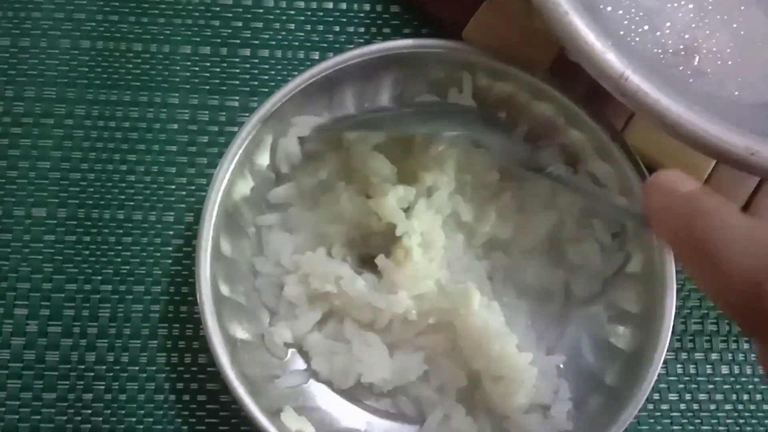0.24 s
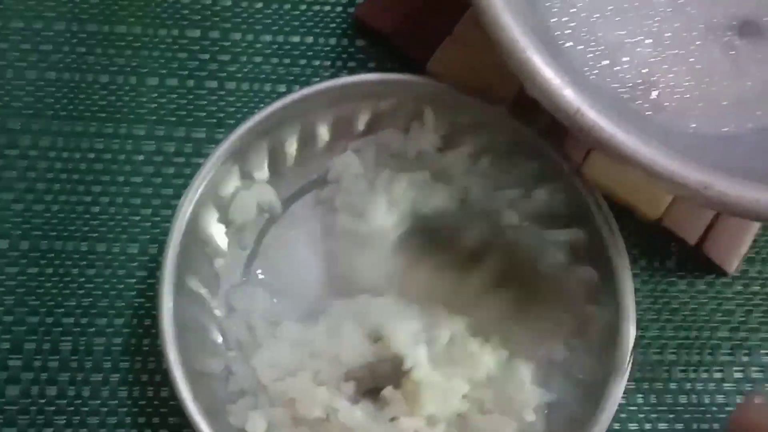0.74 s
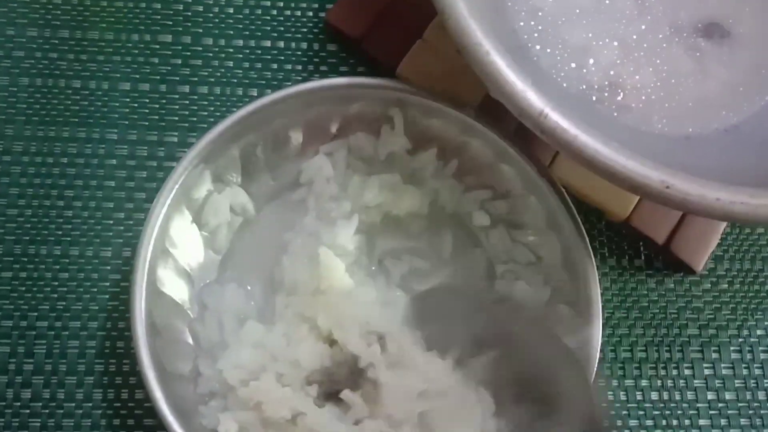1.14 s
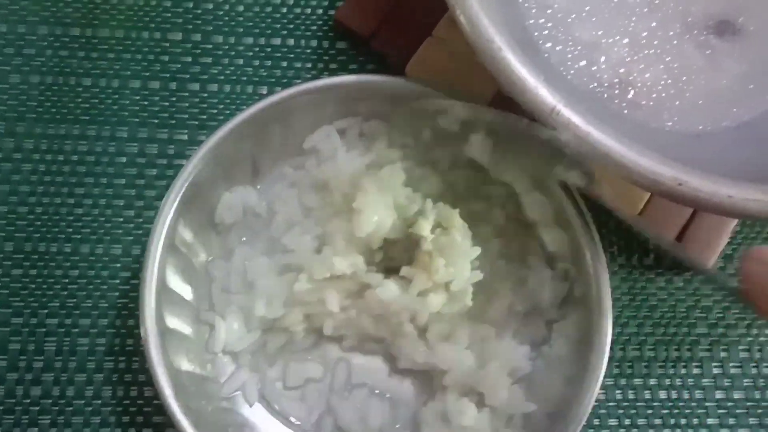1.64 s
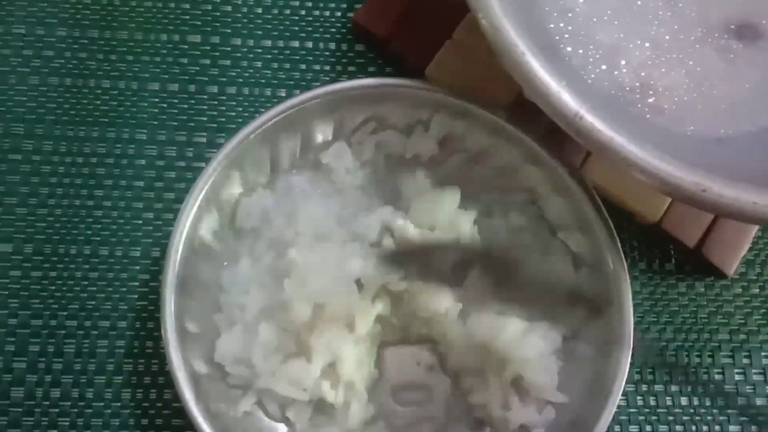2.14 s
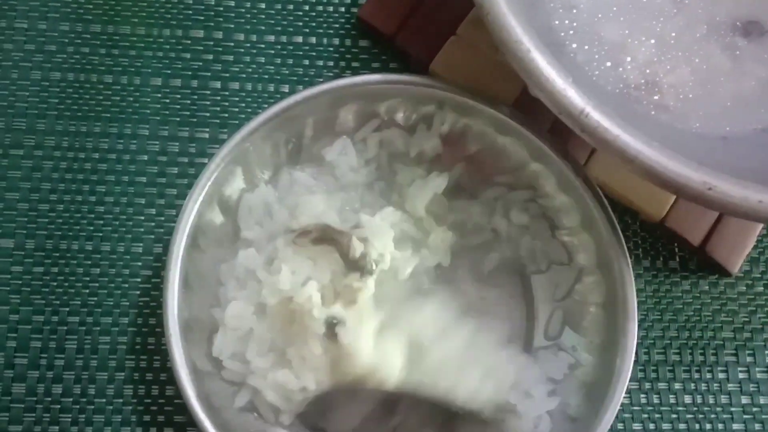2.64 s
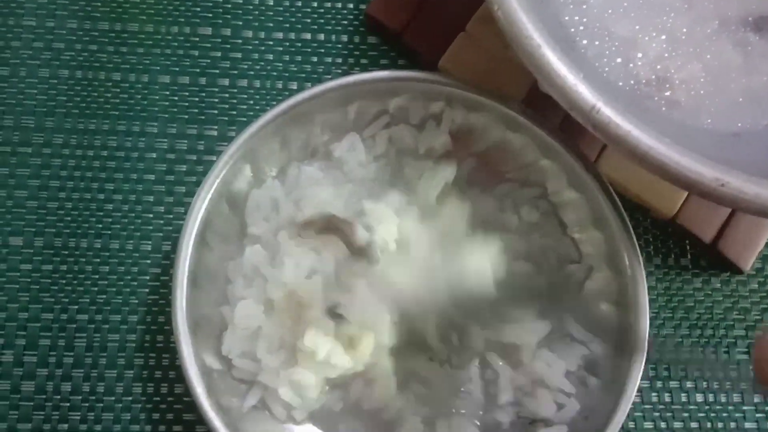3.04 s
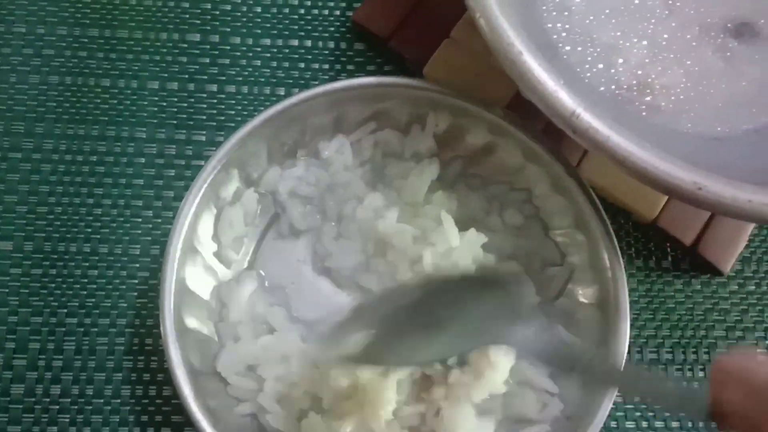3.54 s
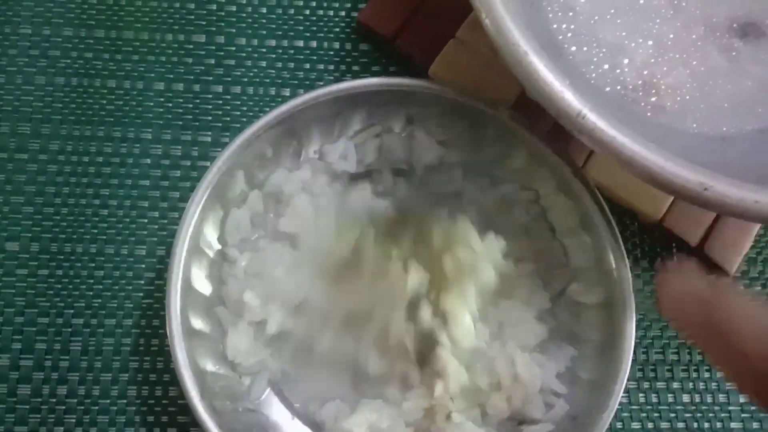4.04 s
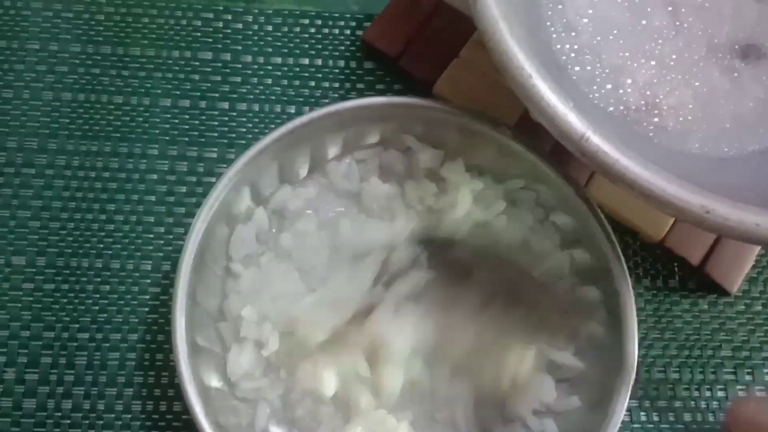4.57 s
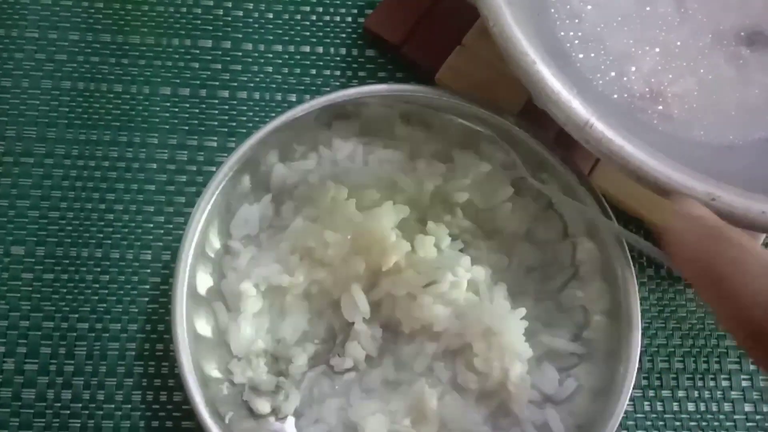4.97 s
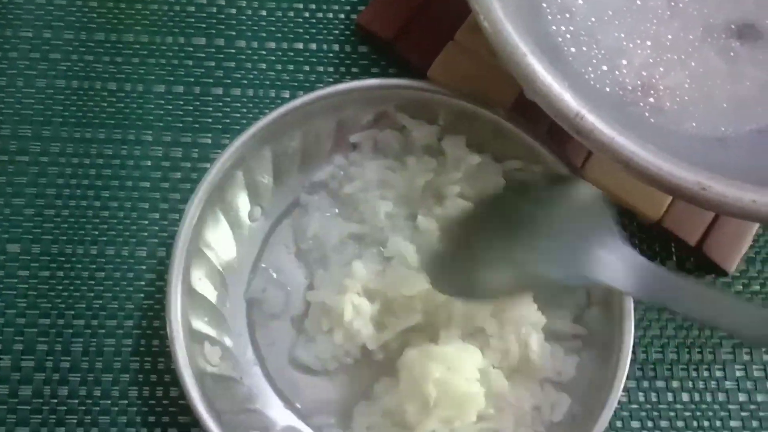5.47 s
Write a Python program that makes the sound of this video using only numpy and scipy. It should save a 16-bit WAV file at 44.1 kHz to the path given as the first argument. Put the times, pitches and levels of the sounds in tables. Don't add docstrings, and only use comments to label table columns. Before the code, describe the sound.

Irregular sharp spoon clanks and short gritty scrapes on a steel dish of rice, with brief rings, pauses and a faint distant horn.

```python
import sys
import numpy as np
from scipy import signal
from scipy.fft import rfft, irfft
from scipy.io import wavfile
from scipy.ndimage import uniform_filter1d

SR = 44100
rng = np.random.default_rng(int(sys.argv[2]) if len(sys.argv) > 2 else 0)


def how_loud(loudness_db):
    steps = np.asarray(loudness_db, float) / 20
    return 10 ** steps


def put_to_file(sound):
    columns = np.atleast_2d(sound).T
    safe = np.clip(columns, -1, 1)
    whole_steps = np.round(safe * 32767)
    wavfile.write(sys.argv[1], SR, whole_steps.astype(np.int16))


N = 251811


def evened(x):
    return x / np.sqrt(np.mean(x ** 2) + 1e-20)


def read(points, hz):
    f, value = np.transpose(points)
    return np.interp(np.log(hz + 1), np.log(f + 1), value)


def layered(events):
    layer = np.zeros(N)
    for s, sound in events:
        part = layer[round(s * SR):][:len(sound)]
        part += sound[:len(part)]
    return layer


def resonate(x, hz, width):
    pole = np.exp((2j * np.pi * hz - np.pi * width) / SR)
    return 2 * signal.lfilter([1 - abs(pole)], [1, -pole], x).real


def wander(size, hz):
    noise = rng.standard_normal(size + 2000)
    return evened(signal.lfilter([1], [1, -np.exp(-2 * np.pi * hz / SR)], noise)[2000:])


def band(x, low_hz, high_hz, order):
    return signal.sosfilt(signal.butter(order, [low_hz, high_hz], "bandpass", fs=SR, output="sos"), x)


def patchy(x, db, size):
    z = signal.stft(x, nperseg=256, noverlap=192)[2]
    patches = uniform_filter1d(rng.standard_normal(z.T.shape), size=size, axis=0)
    patches = uniform_filter1d(patches, size=2, axis=1)
    return signal.istft(z * how_loud(db * evened(patches).T), nperseg=256, noverlap=192)[1][:len(x)]


# (frequency [Hz], level [dB per Hz])
AIR_COLOUR = [(30, -13), (70, -22), (105, -4), (300, -4), (600, -11), (1000, -9.5), (1560, -15),
              (1850, -23), (3000, -24), (8000, -21.5), (9700, -26.5), (10600, -41), (13000, -51),
              (16000, -43)]
# (frequency [Hz], width [Hz], level [dB])
CAVITY_PEAKS = [(831, 98, 7.5), (1495.4, 33.4, 18), (5070, 236, 15), (4310, 54, 11), (6100, 1630, -11.5),
                (6800, 120, 13.5), (7660, 87, 12.5), (3620, 210, -13), (9240, 430, 2.5)]


def air():
    frames, hz = N // 256 + 5, np.fft.rfftfreq(1024, 1 / SR)
    a, b, patches = rng.standard_normal((frames, 513, 3)).T
    patches = uniform_filter1d(patches, size=5, axis=0)
    patches = evened(uniform_filter1d(patches, size=12, axis=1))
    peaks_db = sum(db / (1 + (2 * (hz - f) / w) ** 2) for f, w, db in CAVITY_PEAKS)
    colour_db = read(AIR_COLOUR, hz) + peaks_db
    patchy_db = np.interp(hz, [0, 1500, 4000], [3.0, 2.8, 2.0])
    z = (a + 1j * b) * how_loud(colour_db[:, None] + patchy_db[:, None] * patches)
    return how_loud(-55.5) * evened(signal.istft(z, nperseg=1024, noverlap=768)[1][:N])


# (middle [s], peak level [dB], half length [s])
HUM_SWELLS = [(.05, -65, 0.58), (0.571, -48.5, 0.011), (0.91, -62.5, 0.13), (1.16, -60.5, 0.11),
              (1.398, -48, 0.018), (1.878, -51, 0.05), (2.144, -54.5, 0.16), (2.794, -62, 0.048),
              (3.002, -55.5, 0.068), (3.504, -54, 0.058), (4.4, -60.5, 0.11), (4.967, -57.5, 0.19),
              (5.53, -52.5, 0.26)]


def hum():
    t = np.arange(N) / SR
    hum_hz, bed_db = 352.7, -67
    tone = np.sin(2 * np.pi * np.cumsum(hum_hz + 2.54 * wander(N, hz=6.46)) / SR)
    skirt = evened(resonate(rng.standard_normal(N), hum_hz, 16.7))
    swell = sum(how_loud(db) * np.exp(-((t - s) / half) ** 2) for s, db, half in HUM_SWELLS)
    return (swell + how_loud(bed_db)) * evened(tone + 0.6 * skirt)


def rumble():
    lumps = evened(resonate(wander(N, hz=15.0), 0, 32))
    low_noise = resonate(resonate(rng.standard_normal(N), 113.0, 45), 113.0, 45)
    return how_loud(-68.0 + 4 * lumps) * evened(low_noise)


# (time [s], peak level [dB], frequency [Hz], length [s])
MAT_THUDS = [(0.241, -48, 136.2, 0.053), (0.681, -45.5, 132.5, 0.036), (1.738, -62, 151.3, 0.048),
             (2.306, -52.5, 133.7, 0.065), (2.536, -56, 98, 0.11), (2.673, -71, 93, 0.031),
             (3, -50.5, 132.4, 0.042), (3.431, -53.5, 134.5, 0.041), (3.699, -48, 137.4, 0.056),
             (3.974, -70, 107, 0.039), (4.257, -55.5, 119.4, 0.026), (4.674, -56.5, 152, 0.016),
             (5.074, -45, 129.4, 0.033), (5.352, -56, 139, 0.025)]


def thuds():
    for s, db, hz, length in MAT_THUDS:
        t = np.arange(round(3 * length * SR)) / SR
        turns = np.cumsum(hz * (1 + 0.19 * wander(len(t), hz=31.4))) / SR
        rocking = np.sin(2 * np.pi * turns) + 0.62 * np.cos(4 * np.pi * turns)
        rocking += 0.098 * np.sin(6 * np.pi * turns)
        envelope = 3.13 * (t / (0.35 * length)) * np.exp(-t / (0.55 * length))
        yield s - .01, how_loud(db) * rocking * envelope


# (frequency [Hz], level [dB per Hz])
STEEL_COLOUR = [(530, 17.5), (900, -13.5), (1500, 1), (1820, -13.5), (2010, -1), (2330, -7.5), (2660, 0),
                (4540, -3), (8660, 0), (10300, -8), (14100, -13.5), (15500, -21), (16500, -55.5)]


def steel_db(hz):
    return read(STEEL_COLOUR, hz)


def strike(s, db, low_db, top_db, strongest, rise):
    t = np.arange(4096) / SR
    place, size, life = rng.random((44, 3, 1)).transpose(1, 0, 2)
    hz = 750 + (np.arange(44)[:, None] + place) * 345
    t60 = (0.013 + 0.041 * life ** 2) * (5000 / hz) ** 0.12
    trim_db = np.interp(hz, [3220, 5530, 8800, 10900], [low_db + 10.0, 0, 0, top_db + 24.5])
    mode_db = steel_db(hz) + trim_db + 4 * size - 60 * t / t60
    many = (how_loud(mode_db) * np.sin(2 * np.pi * (hz * t + place))).sum(axis=0)
    few = 0
    for f, width, f_db in strongest:
        decay_db = 60 * t * np.clip(width, 25, 400) / 4.45
        few = few + how_loud(f_db - decay_db) * np.sin(2 * np.pi * f * t)
    rebounds = rng.standard_normal(300) * how_loud(-8.5 - 60 * t[:300] / 0.018) * (rng.random(300) < .05)
    rebounds[0] = 1
    modes = 0.72 * many / abs(many[40:]).max() + 0.43 * few
    chatter = signal.fftconvolve(modes, rebounds)[:len(t)]
    touch = 1.15 * np.sin(2 * np.pi * 4000 * t) * np.exp(-t / 0.0002) * (rise < .0005)
    return s, how_loud(db - 6.5) * (chatter * np.minimum(t / rise, 1) + touch)


# (time [s], peak level [dB], low part [dB], top part [dB])
HARD_BLOWS = [(0.236, -16, -10, -17), (0.3458, -14.5, -11, -26), (0.634, -24.5, 1, -38),
              (0.657, -11.5, -16, -19), (1.0751, -21.5, -15, -16.5), (1.665, -14, -14, -20),
              (1.72, -15.5, -16, -24), (1.7646, -12, -17.5, -27), (2.2844, -17, -19, -15),
              (2.3667, -19.5, -34, -27), (2.5978, -15.5, -10.5, -34), (2.9639, -16.5, -21, -16),
              (2.9836, -13.5, -16.5, -28), (3.4187, -14, -10, -27), (3.676, -16, -66, -18),
              (5.0594, -20.5, -4, -16), (5.2298, -20, -7.5, -17), (5.25, -18, -1, -36),
              (5.3415, -25, -4, -25), (5.7017, -19.5, -25, -20)]
BLOW_MODES_HZ = [(5810.0, 8580.0, 1500.0, 6830.0, 2520.0), (6820.0, 8100.0, 1990.0, 7330.0, 2700.0),
                 (3750.0, 2620.0, 5010.0, 5660.0, 1400.0), (9450.0, 8830.0, 5000.0, 7600.0, 3600.0),
                 (9360.0, 7490.0, 8750.0, 6570.0, 3200.0), (5920.0, 5390.0, 8670.0, 2750.0, 4400.0),
                 (2720.0, 7070.0, 5470.0, 8420.0, 2300.0), (7220.0, 6430.0, 4430.0, 8840.0, 2000.0),
                 (9340.0, 6400.0, 8710.0, 9850.0, 5000.0), (7530.0, 8670.0, 4190.0, 6370.0, 2500.0),
                 (8930.0, 6020.0, 7660.0, 3110.0, 1600.0), (8810.0, 6840.0, 7500.0, 6010.0, 2000.0),
                 (6830.0, 8820.0, 7320.0, 5160.0, 2050.0), (7630.0, 7140.0, 8960.0, 4110.0, 2440.0),
                 (7630.0, 5030.0, 9390.0, 6720.0, 3360.0), (6620.0, 3220.0, 8970.0, 6070.0, 1700.0),
                 (2640.0, 8860.0, 3610.0, 7150.0, 3200.0), (8610.0, 2640.0, 5180.0, 3140.0, 3600.0),
                 (8260.0, 6260.0, 5300.0, 7200.0, 3900.0), (8480.0, 7070.0, 5570.0, 1490.0, 3000.0)]
BLOW_MODES_DB = [(2.5, -2, -10.5, 3.5, 3.5), (-1, -9, -3, 0.5, 6.5), (7.5, 4, 3, 4.5, -8),
                 (-5, -6, 0.5, -15, -16), (3, 1, -1.5, 0, 0.5), (11, 10.5, -2, -23, 3),
                 (2.5, 2, -2, -4, -15), (1.5, -1, -6, -9, -2.5), (1.5, 0, -4, -5.5, 2),
                 (1.5, 1.5, -2.5, -10, -3), (6.5, -1.0, -11, 7.5, -0.5), (6.0, 3, 0, -1.5, -0.5),
                 (-2, 1.0, 0, -6, -3), (-6, -4, -9.5, -9, -9), (-1, 5, -4, 2, -1), (3, 2.5, 0.5, 0.5, 4),
                 (4.5, -8, 0.0, -2, 2.5), (-5, -1.0, -3.5, -6, -15), (3, 0, -0.5, 3, -8),
                 (4.5, 3.5, 0, 2.5, 4.5)]


def blows():
    for row, modes_hz, modes_db in zip(HARD_BLOWS, BLOW_MODES_HZ, BLOW_MODES_DB):
        strongest = [(hz, 159 * (5000 / hz) ** 0.9, db) for hz, db in zip(modes_hz, modes_db)]
        yield strike(*row, strongest, rise=0.00039)


def speck(s, db, hz, t60):
    t = np.arange(round(t60 * SR)) / SR
    puff = np.sin(2 * np.pi * hz * t) * how_loud(db - 60 * t / t60) * np.minimum(t / .0015, 1)
    return s, puff * (1 + .5 * wander(len(t), hz=hz / 20))


# (time [s], frequency [Hz], t60 [s])
BOTTOM_KNOCKS = [
    (.237, 1500, .14),
    (.347, 1950, .08),
    (.659, 1513, .18),
    (.69, 1650, .15),
    (3.678, 1680, .1),
    (1.666, 1480, .08),
    (5.252, 2900, .03),
    (3.332, 5600, .04),
]
BOTTOM_KNOCK_DB = [-39.5, -51, -49, -43, -44.5, -38, -36, -50]


def knocks():
    for (s, hz, t60), db in zip(BOTTOM_KNOCKS, BOTTOM_KNOCK_DB):
        yield speck(s, db, hz, t60)


def three_bands(x):
    hz = np.fft.rfftfreq(len(x), 1 / SR)
    low = 1 / (1 + (hz / 4400) ** 8)
    top = 1 / (1 + (10000 / (hz + 1)) ** 12)
    coloured = rfft(x) * how_loud(steel_db(hz))
    return [evened(irfft(coloured * share, len(x))) for share in (low, 1 - low - top, top)]


# (start [s], pressure [dB], length [s], low part [dB], top part [dB])
SPOON_PUSHES = [(0.241, -47, 0.28, 1, -15), (0.323, -45, 0.19, -19, -4), (0.395, -38, 0.075, -4, -11),
                (0.658, -35, 0.13, -16, -9), (0.722, -51.5, 0.16, 3, -11), (1.073, -34, 0.043, -24, -20),
                (1.127, -44, 0.086, -29, -21), (1.671, -41, 0.29, -2.5, -21),
                (1.762, -40.5, 0.17, 3.5, -22), (2.285, -39.5, 0.16, -8, -14), (2.326, -41, 0.05, -10, -1),
                (2.386, -42, 0.048, -2, -12), (2.596, -40.5, 0.12, 2, -18), (2.632, -42, 0.13, -2, -19),
                (2.97, -40, 0.15, -1.5, -20), (3.34, -59, 0.21, -3, -7), (3.389, -47.5, 0.21, -16, -4),
                (3.443, -40.5, 0.1, -5.5, -14), (3.679, -37.5, 0.2, -5, -10), (5.059, -40, 0.08, -17, -24),
                (5.124, -45.5, 0.42, 2, -8), (5.222, -47.5, 0.2, 4, -7), (5.334, -38, 0.058, -27, -4.5)]
# (from [s], frequency [Hz], frequency [Hz], frequency [Hz])
FREE_PLACES = [(0, 5600, 7100, 9070), (.6, 5080, 6130, 6700), (1, 9380, 7750, 9150),
               (1.12, 3330, 7700, 9300), (1.6, 6470, 7400, 8780), (2.2, 6300, 9040, 11020),
               (2.55, 5940, 7600, 8860), (2.9, 8800, 7100, 8600), (3.3, 5340, 7350, 8900),
               (3.6, 5020, 6530, 8800), (5, 8400, 6500, 9100), (5.1, 6830, 8800, 8700)]


def pushes():
    press_s, held_share = 0.0051, 0.27
    for s, db, length, low_db, top_db in SPOON_PUSHES:
        end = press_s + length
        t = np.arange(s, s + press_s + length, 1 / SR) - s
        corners = [0, press_s, press_s + held_share * length, end]
        pressure_db = np.interp(t, corners, [db - 4, db, db + 3, db - 29])
        treble_db = np.interp(t, corners, [top_db, top_db, top_db, top_db - 27])
        grit = rng.standard_normal(len(t))
        grit *= how_loud(2.5 * wander(len(t), hz=252) + 1.3 * wander(len(t), hz=41.0))
        close_modes = rng.uniform([1200, -12], [15600, 0], (70, 2))
        close = sum(how_loud(mode_db) * resonate(grit, hz, 92) for hz, mode_db in close_modes)
        low, middle, top = three_bands(evened(close) + 0.3 * evened(grit))
        place = [row for row in FREE_PLACES if row[0] < s][-1]
        free = sum(evened(resonate(grit, hz, 83)) for hz in place[1:])
        sound = middle + how_loud(low_db) * low + how_loud(treble_db) * top + how_loud(-1.0) * evened(free)
        fade = np.minimum(1, np.minimum(t / 0.0016, (end - t) / 0.048))
        yield s, how_loud(pressure_db - 10.5) * patchy(sound, 2.94, size=10) * fade


# (time [s], peak level [dB], frequency [Hz])
EDGE_TICKS = [(0.2514, -25, 5920), (0.3114, -36, 8900), (0.3708, -35, 7790), (0.6768, -23, 5890),
              (1.1, -44, 9020), (2.2878, -23.5, 9330), (2.3047, -30, 9380), (2.3974, -43, 6420),
              (2.6034, -14.5, 8940), (2.6102, -25, 7650), (3.6874, -19.5, 7850), (3.699, -36, 7600),
              (5.139, -28.5, 9100), (5.2804, -31, 6300), (5.323, -29, 9400), (5.3534, -27, 8820)]


def ticks():
    for s, db, hz in EDGE_TICKS:
        yield strike(s, db, -14, -22, [(hz, 300, 3)], rise=0.0008)


def ring(modes, s, level_db, free_s, broken_db):
    t = np.arange(SR // 2 + 8000) / SR
    hz, db, t60 = np.transpose(modes)[:, :, None]
    drop_db = np.interp(hz, [1870, 2320, 2720, 3500], [5, 6, 10, 20])
    drag_db = np.interp(hz, [1870, 2230, 2320, 2720], [32, 100, 95, 140])
    touched_db = drop_db * np.clip((t - free_s) / 0.0072, 0, 1) + drag_db * np.maximum(t - free_s, 0)
    sound = (how_loud(db - 60 * t / t60 - touched_db) * np.sin(2 * np.pi * hz * t)).sum(axis=0)
    return s, how_loud(level_db) * patchy(sound, broken_db, size=12) * np.minimum(t / 0.0046, 1)


# (time [s], frequency [Hz], t60 [s])
LONE_MODES = [(5.09, 4155, .34), (.636, 2584, .5), (1.77, 4155, .22), (.66, 2229, .38), (.66, 5895, .3),
              (3.712, 5914, .2), (3.69, 2546, .3), (2.6, 7660, .3), (2.6, 8930, .15), (2.335, 5900, .2),
              (1.158, 7680, .3), (1.14, 3240, .07), (3.0, 8810, .2), (3.02, 4190, .15), (2.367, 4190, .14),
              (3.785, 7680, .2), (.7, 7655, .35), (5.3, 1510, .3), (2.612, 2590, .35), (.348, 2000, .06),
              (.66, 1875, .5), (.66, 3600, .3), (.66, 4200, .25), (.66, 13300, .3), (3.68, 13400, .22),
              (.415, 11200, .1)]
LONE_MODES_DB = [-44, -43, -42, -51, -43, -35, -49.5, -58, -51, -57, -57, -42, -52, -50, -43, -39, -48,
                 -50.5, -53, -33.5, -58, -53, -48, -56, -52, -48]


def lone_modes():
    for (s, hz, t60), db in zip(LONE_MODES, LONE_MODES_DB):
        yield ring([(hz, 0, t60)], s, db, free_s=1, broken_db=0.59)


# (time [s], peak level [dB], low part [dB], top part [dB])
SOFT_SLIPS = [(0.394, -27, -23, -29), (0.41, -28, -20, -24), (1.15, -28.5, -4, -12),
              (1.815, -21.5, -30, -32), (2.3279, -16, -17, -20), (2.3994, -35.5, -31, -20),
              (3.332, -31.5, -39, -24), (3.401, -23.5, -19, -18), (3.457, -31, -20, -25),
              (3.4872, -25, 1, -18), (5.16, -33.5, -11, -22), (5.213, -26, -5, -15), (5.28, -21, 8, -24),
              (5.3036, -20.5, -40, -22)]
# (frequency [Hz], frequency [Hz])
SLIP_MODES_HZ = [(7800, 9280), (5350, 7660), (3240, 9030), (5670, 6550), (6370, 9390), (6430, 7660),
                 (1510, 8880), (7700, 6300), (7830, 4160), (3130, 5450), (5300, 2910), (8980, 6760),
                 (1690, 3270), (8970, 6440)]
# (level [dB], level [dB])
SLIP_MODES_DB = [(9, -7), (13, 11), (3, 2), (2, -2), (7, 4), (11, 10), (4, 3), (1, 2), (10, 7.5), (-6, -1),
                 (13, 7), (0, -5), (2.5, -11), (4, 4)]


def slips():
    for (s, *levels), modes_hz, modes_db in zip(SOFT_SLIPS, SLIP_MODES_HZ, SLIP_MODES_DB):
        strongest = [(hz, 200, db) for hz, db in zip(modes_hz, modes_db)]
        yield strike(s - .002, *levels, strongest, rise=0.0035)


RIM_MODES_HZ = [1816, 1868, 2226, 2319, 2586, 2697, 2738, 3704, 3902, 4150, 4775, 5489, 5687, 5927, 6611,
                8409, 8651]
# (level [dB], t60 [s])
RIM_MODES = [(-14, 2), (-20, 1.5), (-14, 2.4), (-12, 2.6), (-19, 1.3), (-17, .7), (-7, .9), (-13, .3),
             (-16, .35), (-20, .3), (-21, .3), (-8, .14), (-11, .3), (-18, .35), (-12, .12), (-20, .3),
             (-20, .3)]
# (time [s], level [dB], time until touched [s], unevenness [dB])
FREE_RIM = [
    (.634, -46, 0.115, 3),
    (1.665, -25.5, 0.097, .8),
]


def rim_rings():
    for row in FREE_RIM:
        yield ring(np.c_[RIM_MODES_HZ, RIM_MODES], *row)


SPOON_MODES_HZ = [1515, 2584, 3590, 4190, 5000, 5905, 6288, 6780, 7564, 7648, 7680, 8936, 9335, 9435, 11075,
                  12760]
# (level [dB], t60 [s])
SPOON_MODES = [(-11.5, 0.52), (-11, 0.31), (-5, 0.37), (-3, 0.23), (-18, 0.51), (-15, 0.14), (-22, 0.27),
               (-18, 0.19), (2, 0.32), (14, 0.34), (-7, 0.34), (6, 0.24), (-7, 0.69), (8, 0.3), (-2, 0.33),
               (-6, 0.28)]
# (time [s], level [dB], time until touched [s], unevenness [dB])
FREE_SPOON = [
    (0.658, -46.5, 0.185, 2.8),
    (2.284, -59, 0.17, 2.7),
    (2.598, -57.5, 0.077, 1.5),
    (3.677, -43.5, 0.212, 3.6),
]


def spoon_rings():
    for row in FREE_SPOON:
        yield ring(np.c_[SPOON_MODES_HZ, SPOON_MODES], *row)


# (time [s], peak level [dB], frequency [Hz], t60 [s])
STRAY_SPECKS = [
    (1.407, -57, 11200, .02),
    (1.447, -52, 10600, .02),
    (1.475, -52, 1150, .08),
    (2.097, -45, 860, .07),
    (2.778, -55, 10900, .015),
    (4.203, -49, 890, .08),
    (4.815, -62, 12000, .02),
]


def specks():
    for row in STRAY_SPECKS:
        yield speck(*row)


# (time [s], level [dB])
HORN_LEVEL = [
    (4.362, -67),
    (4.4, -65),
    (4.52, -58),
    (4.65, -58),
    (4.8, -59.5),
    (5.05, -60),
    (5.15, -68),
    (5.24, -87),
]
# (time [s], frequency [Hz])
HORN_PITCH = [(4.36, 235.5), (4.5, 233), (4.8, 232.4), (5.24, 231)]
# (multiple of the pitch [1], level [dB])
HORN_PARTIALS = [(16, 0), (17, -9), (18, 0), (19, -10), (20, -7), (21, -12), (22, -11)]


def horn():
    s, db = np.transpose(HORN_LEVEL)
    t = np.arange(s[0], s[-1], 1 / SR)
    pitch_hz = np.interp(t, *np.transpose(HORN_PITCH)) * (1 + .0015 * wander(len(t), hz=25))
    turns = np.cumsum(pitch_hz) / SR
    partials = 0
    for k, part_db in HORN_PARTIALS:
        flutter = evened(resonate(rng.standard_normal(len(t)), 10, 11))
        smear = evened(resonate(rng.standard_normal(len(t)), 12, 14))
        partials = partials + how_loud(part_db + 4 * flutter) * np.sin(2 * np.pi * k * turns + .45 * smear)
    return s[0], how_loud(np.interp(t, s, db)) * evened(partials)


def room(x):
    taps = np.zeros(SR // 2)
    at = np.arange(200, len(taps) - 20, 20)
    taps[at + rng.integers(0, 20, len(at))] = rng.choice([-1., 1.], len(at))
    hz, t, z = signal.stft(taps, SR, nperseg=256)
    t60 = read([(500, 0.38), (4000, 0.23), (15000, 0.23)], hz)[:, None]
    tail = signal.istft(z * how_loud(-60 * t / t60), SR, nperseg=256)[1]
    return signal.fftconvolve(x, tail / np.linalg.norm(tail))[:N]


def scene():
    far = air() + hum() + rumble()
    near = layered(blows()) + layered(slips()) + layered(pushes())
    near = band(near, 700, 18000, order=2)
    singing = layered(rim_rings()) + layered(spoon_rings()) + layered(lone_modes())
    far += layered(thuds()) + layered(specks()) + layered([horn()])
    mix = near + how_loud(-8.5) * room(near) + singing + far
    mix += layered(knocks()) + layered(ticks())
    return mix[None]


def low_pass(x):
    return signal.sosfilt(signal.butter(12, 16680, fs=SR, output="sos"), x)


def record(dry):
    kept = band(dry, 112, 19000, order=1)
    steep = signal.oaconvolve(kept, signal.firwin(255, 15550, fs=SR)[None], "same")
    finished = steep + how_loud(-15) * (kept - steep)
    return low_pass(finished)


dry = scene()
out = record(dry)
put_to_file(out)
```